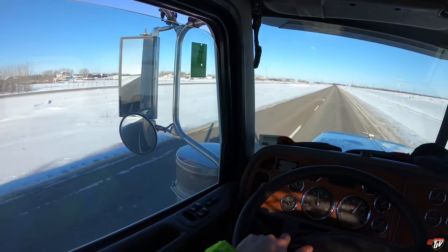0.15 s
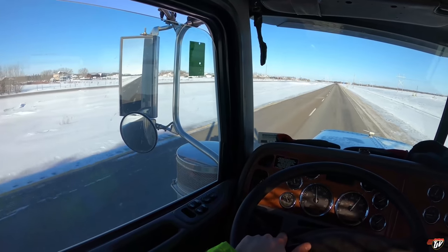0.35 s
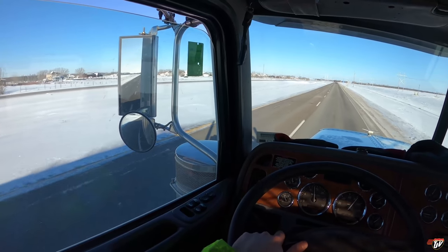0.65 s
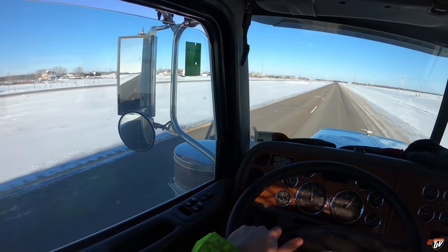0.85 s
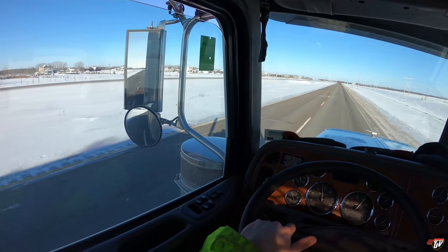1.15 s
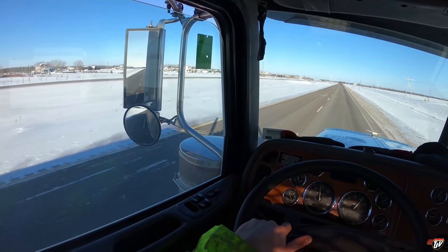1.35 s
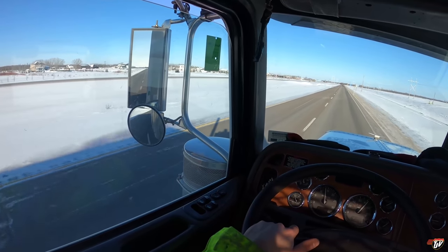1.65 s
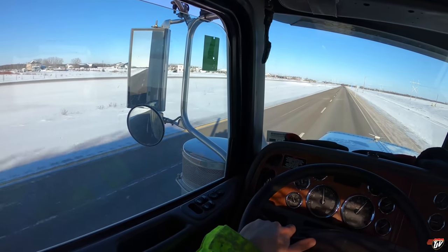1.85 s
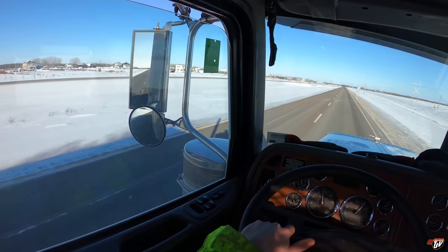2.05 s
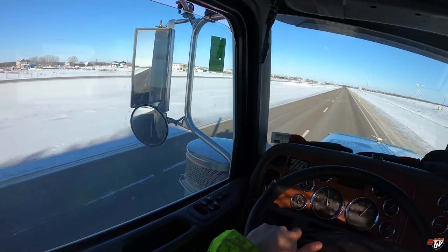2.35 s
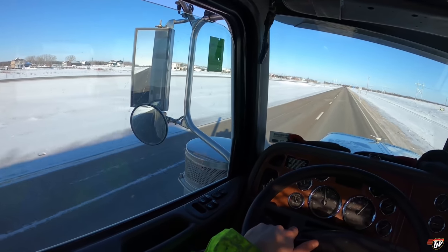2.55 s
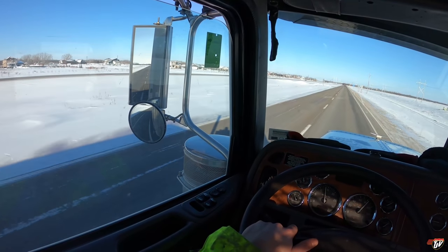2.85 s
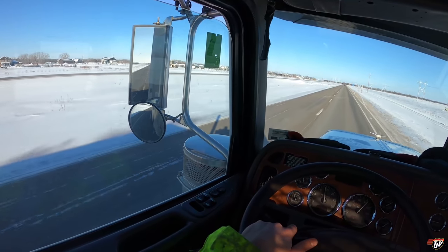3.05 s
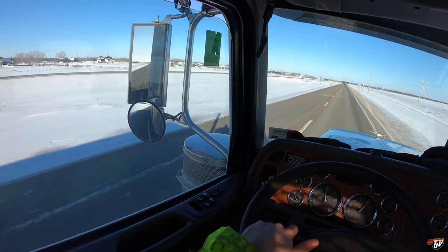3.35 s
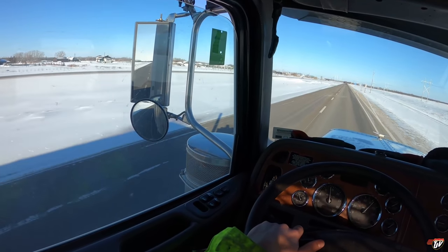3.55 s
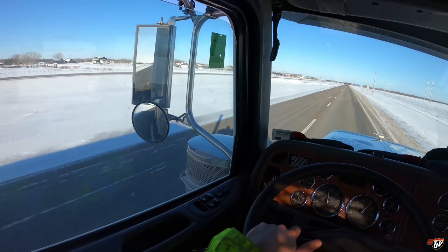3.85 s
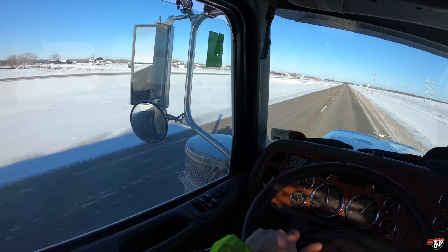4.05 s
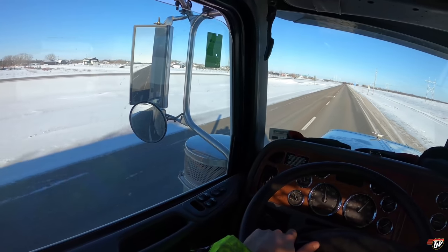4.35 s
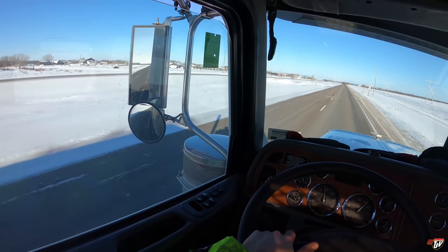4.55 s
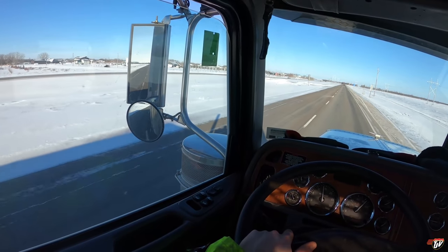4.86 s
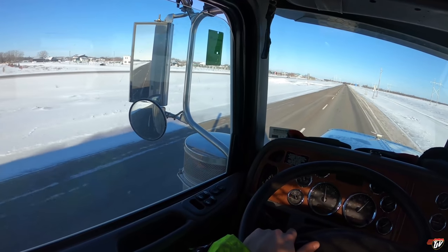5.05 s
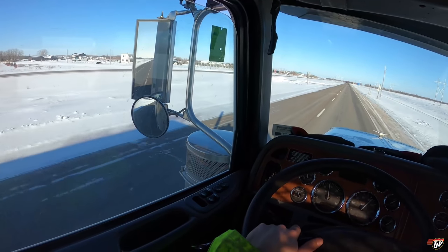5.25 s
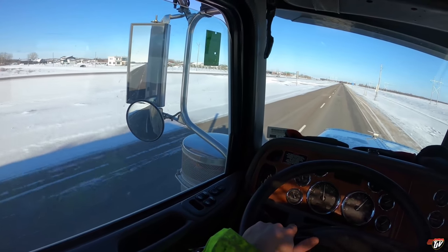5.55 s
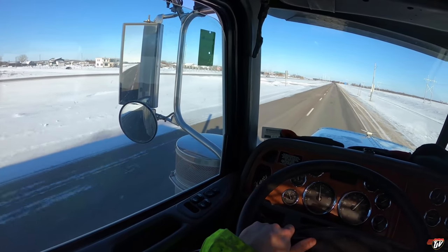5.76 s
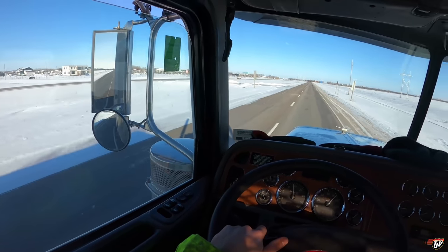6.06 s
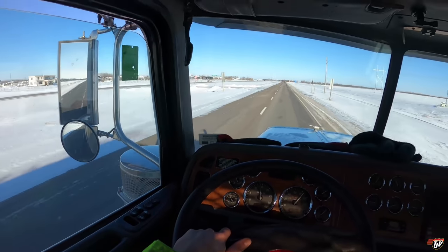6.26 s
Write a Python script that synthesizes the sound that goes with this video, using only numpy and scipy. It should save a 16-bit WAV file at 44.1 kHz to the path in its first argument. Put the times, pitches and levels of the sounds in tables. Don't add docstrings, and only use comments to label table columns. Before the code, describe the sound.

Inside a truck cab, a deep, steady diesel engine drone slowly rises in pitch over floor rumble and a constant roar of tyres and wind.

```python
import sys
import numpy as np
from scipy import signal
from scipy.fft import rfft, irfft, next_fast_len
from scipy.io import wavfile
from scipy.ndimage import uniform_filter1d, minimum_filter1d, map_coordinates

SR = 44100
rng = np.random.default_rng(int(sys.argv[2]) if len(sys.argv) > 2 else 0)


def nominal_scale(level):
    x = np.asarray(level, float) / 20
    return 10 ** x


def store_wav(level_fs):
    pcm = np.round(np.clip(np.atleast_2d(level_fs), -1, 1) * 32767)
    wavfile.write(sys.argv[1], SR, pcm.T.astype(np.int16))


N = 282681
T = np.arange(N) / SR
SIZE = next_fast_len(N)
HZ = np.maximum(np.arange(SIZE // 2 + 1) * SR / SIZE, 1)

# start_s, cycle_hz
CYCLE = [(0, 10.99), (1, 11.079), (2, 11.134), (3, 11.199), (4, 11.253), (5, 11.303), (6.41, 11.36)]


def over_time(table):
    s, *columns = np.transpose(table)
    return [np.interp(T, s, c) for c in columns]


def over_hz(table):
    hz, *columns = np.transpose(table)
    return [np.interp(np.log(HZ), np.log(hz), c) for c in columns]


def walk(rate_hz):
    knots = rng.standard_normal(1000)
    coarse_s = T[::64]
    curve = map_coordinates(knots, [coarse_s * rate_hz], order=3)
    return np.interp(T, coarse_s, 1.1 * curve)


def pull():
    hz = over_time(CYCLE)[0]
    return (hz - hz[0]) / (hz[-1] - hz[0])


def engine():
    orders = [2, 3, 4, 5, 6, 7, 8, 9, 10, 11, 12, 13, 14, 15, 16, 18, 20, 22, 23, 24, 28, 30, 32, 34, 38,
              39]
    # start_level_db, end_level_db
    order_levels = [(-30.5, -31), (-36, -38), (-33, -36.5), (-36.5, -38.5), (-43.5, -45), (-33, -34.5),
                    (-30.5, -26.5), (-34, -28), (-40, -28.5), (-37, -30), (-13.5, -15.5), (-39, -43),
                    (-28.5, -29.5), (-31.5, -43.5), (-29.5, -27), (-29.5, -37), (-50.5, -50), (-38, -40),
                    (-41, -46), (-36.5, -40), (-41.5, -50.5), (-46.5, -51.5), (-60, -61), (-60, -61),
                    (-57.5, -56.5), (-52.5, -51)]
    leaning = {2: (0, .2), 6: (-4, -.8), 8: (.6, .04), 14: (.5, -.13), 16: (2, 0), 18: (-.7, -.12),
               22: (4, 0), 24: (-.2, -.28), 28: (.6, .5), 32: (1.4, 0)}
    cycle = 2 * np.pi * np.cumsum(over_time(CYCLE)[0]) / SR
    port = np.array([[.5], [-.5]])
    drone = np.zeros((2, N))
    for order, (first_db, last_db) in zip(orders, order_levels):
        pan_db, lead = leaning.get(order, (.4, .08))
        loose = .6 if order == 12 else 1
        level_db = first_db + (last_db - first_db) * T / T[-1]
        level_db = level_db + 1.8 * loose * walk(2.5)
        lag = .8 * rng.random() + np.pi / 2 * (order % 4 == 2)
        angle = order * cycle + lag + .35 * loose * walk(5.0)
        line = np.sqrt(2) * nominal_scale(level_db) * np.exp(1j * angle)
        drone += (nominal_scale(port * pan_db) * np.exp(1j * port * lead) * line).imag
    return drone, cycle


def airborne(db_per_hz, swell_db, rate_hz, count):
    # pitch_hz, alike (0-1), left_minus_right_db, left_leads_radians
    ports = [(10, 0.95, 3.5, .15), (40, 1, 0.5, .12), (119, 0.99, 1, .06), (260, 0.93, -0.1, -0.13),
             (530, 0.96, 2, -0.26), (1100, 0.88, 3.5, -0.54), (2300, 0.73, 4, -.8), (4550, 0.33, 2, -.6),
             (8900, .2, 0, -0.99), (14000, 0, -2, -0.11)]
    alike, pan_db, lead = over_hz(ports)
    alike = np.clip(alike, 0, 1)
    common, left, right = rfft(rng.standard_normal((3, SIZE)), axis=1)
    turn = np.sqrt(alike) * np.exp(.5j * lead)
    apart = np.sqrt(1 - alike)
    at_left = (turn * common + apart * left) * nominal_scale(pan_db / 2)
    at_right = (turn.conj() * common + apart * right) * nominal_scale(-pan_db / 2)
    pair = np.array([at_left, at_right]) * nominal_scale(db_per_hz) * np.sqrt(SR / 2)
    place = np.clip(np.log(HZ / 16) / np.log(1000), 0, 1) * (count - 1)
    noise = np.zeros((2, N))
    for k in range(count):
        share = np.clip(1 - abs(place - k), 0, 1)
        band = irfft(pair * share, SIZE, axis=1)[:, :N]
        noise += band * nominal_scale(swell_db * walk(rate_hz))
    return noise


def rumble():
    # pitch_hz, level_db (per Hz)
    colour = [(4, -63), (12, -47.5), (24, -36), (40, -39.5), (62, -42), (95, -40), (125, -41), (150, -47.5),
              (240, -52.5), (285, -57.5), (400, -68.5), (700, -90), (2000, -140)]
    # start_s (the middle), lift_db, length_s
    bumps = [
        (.3, 1, 0.28),
        (1.37, 3, .12),
        (2.139, 6, .16),
        (6.0, -1, .4),
    ]
    level_db = 3 * (pull() - .5) - 0.8
    for s, lift_db, length_s in bumps:
        level_db = level_db + lift_db * np.exp(-((T - s) / length_s) ** 2)
    return airborne(over_hz(colour)[0], swell_db=0.1, rate_hz=6.4, count=6) * nominal_scale(level_db)


def roar(cycle):
    # pitch_hz, level_db (per Hz)
    colour = [(190, -22), (330, -2), (400, -5.5), (640, -4), (770, -7.5), (1170, -8.5), (1730, -13.5),
              (3130, -17.5), (5000, -26.5), (7000, -33.5), (9700, -40.5), (10600, -51), (12200, -51.5),
              (15000, -63.5)]
    # pitch_hz, width_hz, lift_db
    panels = [(452, 51, 3.5), (521, 46, 3.5), (684.7, 15, 8), (925, 52, 5), (1076, 94, 3), (1295, 44, 2),
              (1738, 54, -5.5), (2223, 83, -4.5), (2128, 20, 8), (2193, 14, 5), (2550, 60, 0.5),
              (2850, 35, -2), (3110, 97, -5), (3470, 200, 4), (3610, 23, 7), (3750, 30, 5), (4700, 30, 5),
              (6290, 240, 4), (7750, 330, 3.5), (14250, 300, 2)]
    lift_db = sum(db / (1 + (2 * (HZ - hz) / width_hz) ** 2) for hz, width_hz, db in panels)
    noise = airborne(over_hz(colour)[0] + lift_db, swell_db=.3, rate_hz=9.0, count=8)
    beat = 1 + 0.032 * np.sin(6 * cycle) + 0.033 * np.sin(cycle)
    level_db = -32 + 1.77 * (pull() - 0.61)
    return noise / noise.std() * beat * nominal_scale(level_db)


def gears(cycle):
    gear_orders = 104, 72.5
    # level_db, mode_hz, width_hz, lift_db
    modes = [
        (-45, 1167, 22, -16),
        (-59, 815, 16, 12),
    ]
    hz = over_time(CYCLE)[0]
    whine = 0
    for order, (level_db, mode_hz, width_hz, lift_db) in zip(gear_orders, modes):
        level_db = level_db + lift_db * np.exp(-(2 * (order * hz - mode_hz) / width_hz) ** 2)
        level = nominal_scale(level_db + 1.0 * walk(9.0))
        whine = whine + level * np.exp(1j * (order * cycle + 0.76 * walk(3.0)))
    port = np.array([[1], [-1]])
    return np.sqrt(2) * (whine * nominal_scale(2.4 * port) * np.exp(-.4j * port)).imag


def turbo():
    pitch_hz = 9510 + 300 * pull() + 30 * walk(60.)
    level_db = -83 + 7.5 * pull() ** 2 + 2.5 * walk(25.)
    tone = np.sin(2 * np.pi * np.cumsum(pitch_hz) / SR)
    return np.sqrt(2) * tone * nominal_scale(level_db) * np.array([[1.1], [.9]])


def scene():
    drone, cycle = engine()
    return drone + rumble() + roar(cycle) + gears(cycle) + turbo()


def roll_off(x):
    return signal.sosfilt(signal.butter(12, 15010, fs=SR, output="sos"), x)


def record(dry):
    bass = signal.sosfiltfilt(signal.butter(2, 300, fs=SR, output="sos"), dry)
    swell = uniform_filter1d(np.mean(bass ** 2, axis=0), int(0.068 * SR))
    held = bass * np.minimum(1, (nominal_scale(-14.5) ** 2 / (swell + 1e-12)) ** 0.18)
    room = np.minimum(1, .47 / (abs(held).max(axis=0) + 1e-9))
    held = held * uniform_filter1d(minimum_filter1d(room, size=260), size=260)
    rounded = .9 * np.tanh(held / .9)
    heard = rounded + (dry - bass) * (1 - 0.41 * rounded ** 2)
    heard = heard * np.minimum(1, T / .002)
    return roll_off(heard)


dry = scene()
out = record(dry)
store_wav(out)
```